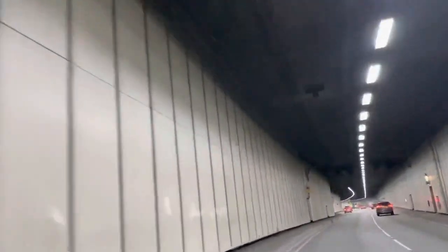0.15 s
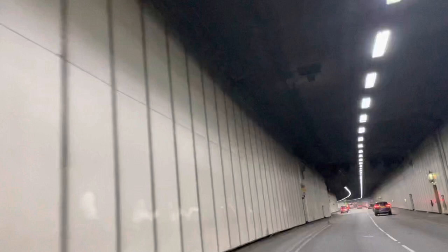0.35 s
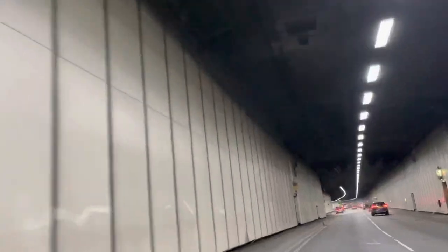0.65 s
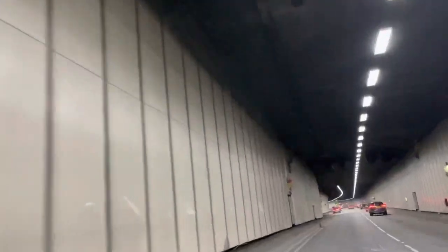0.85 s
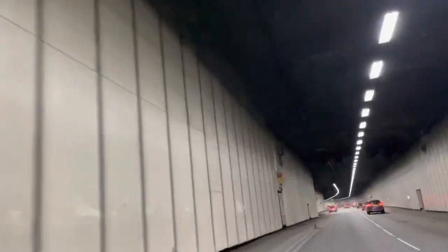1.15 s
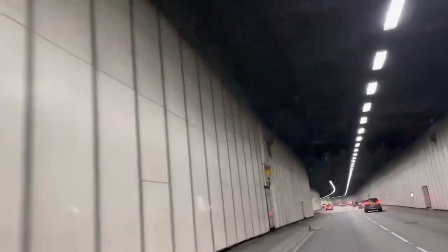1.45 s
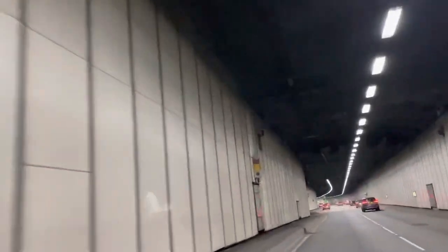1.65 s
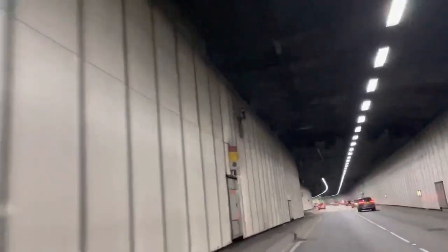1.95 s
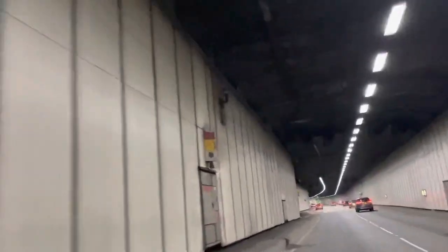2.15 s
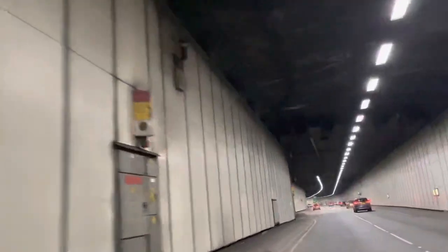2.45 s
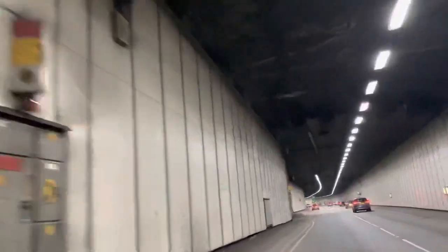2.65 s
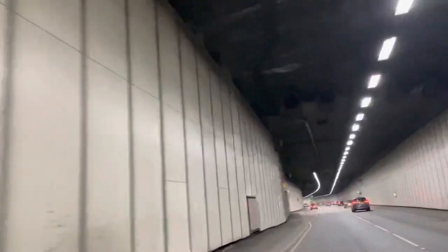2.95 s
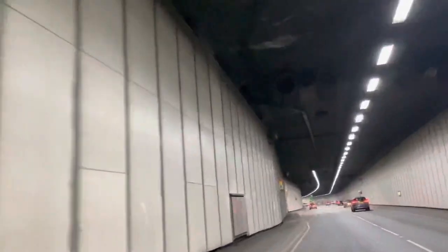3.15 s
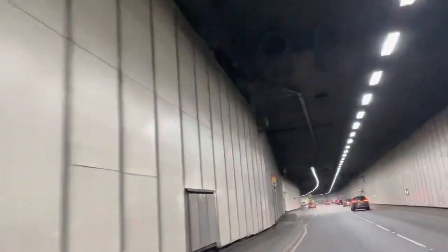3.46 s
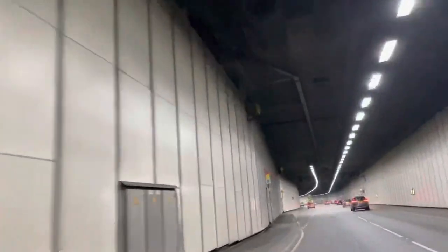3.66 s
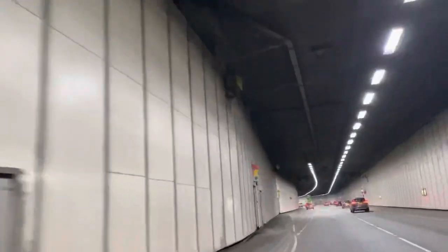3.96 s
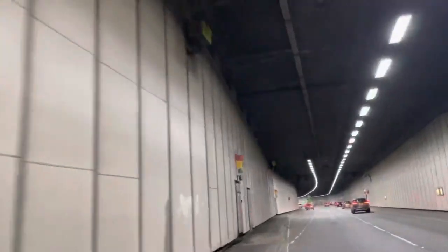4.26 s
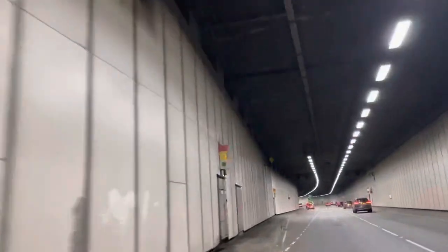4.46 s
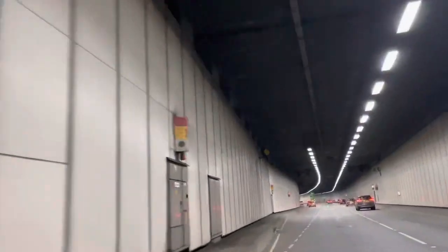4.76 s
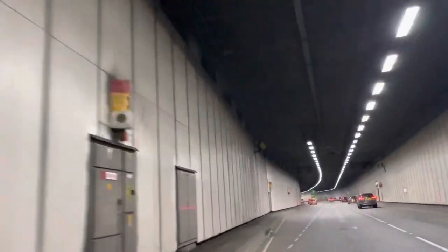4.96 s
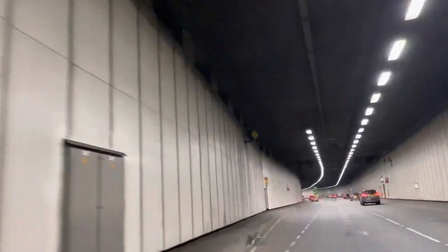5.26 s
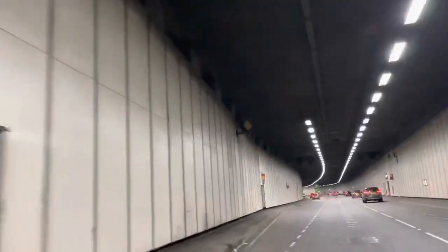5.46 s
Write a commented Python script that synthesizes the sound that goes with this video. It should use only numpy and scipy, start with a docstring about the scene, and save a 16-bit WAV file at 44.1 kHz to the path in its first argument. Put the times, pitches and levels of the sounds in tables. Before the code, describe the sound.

Heard from the front seat of a car cruising through a road tunnel: a steady low rumble, humming tyre drone and duller roar from the walls through the glass. Loose plastic close to the stereo microphones, mostly left, ticks and crackles in irregular clusters, thickest just before two seconds and after four. Small bumps boom in the cabin, and tyres sing briefly between two and four seconds.

```python
"""Inside a car at steady speed in a road tunnel.
The road shakes the cabin into a low rumble, the tyres drone, hum and sing, and their roar returns from the walls
through the glass: all of this is coloured noise or wavering tones. Bumps make the cabin boom like a struck drum.
Loose plastic close to the microphones, a little to the left, ticks and crackles as small slips set it ringing,
and some slips flex its panel into thumps that fall in pitch."""
import sys
import numpy as np
from scipy import signal
from scipy.fft import rfft, irfft
from scipy.io import wavfile

SR = 44100
rng = np.random.default_rng(int(sys.argv[2]) if len(sys.argv) > 2 else 0)


def digitize_waveform(pressure):
    """Quantize a signal to 16-bit integers and store it at the path in sys.argv[1].

    Rows of a 2-D input are taken as channels; values are limited to [-1, 1].
    """
    field = np.atleast_2d(pressure).T
    bounded = np.clip(field, -1, 1)
    quanta = np.round(bounded * 32767).astype(np.int16)
    wavfile.write(sys.argv[1], SR, quanta)


N = 247401
TIME = np.arange(N) / SR   # seconds
BINS = np.arange(N // 2 + 1) * SR / N   # Hz of each step in a spectrum

# noise colours, how strong each pitch is: pitch_hz, level_db
RUMBLE_COLOUR = [(20, -31), (32, -17.5), (42, -10), (55, -2), (75, -3), (100, -6), (135, -10), (220, -27),
                 (500, -72)]
DRONE_COLOUR = [(60, -43.5), (115, -3.5), (150, -0.5), (215, 0.5), (280, -1.5), (400, -2), (470, -7),
                (530, -5.5), (620, -10), (900, -25), (2000, -68)]
ROAR_COLOUR = [(200, -2.5), (500, -1), (700, 2), (1050, 1.5), (1500, -6), (2000, -13), (2700, -18.5),
               (3600, -25), (5000, -28.5), (6300, -32), (8000, -41), (11000, -51), (14200, -75.5),
               (15500, -65)]
# how alike left and right are: pitch_hz, correlation (held between -1 and 1 when used)
LIKENESS = [(40, 0.92), (150, 0.8), (380, 0.72), (600, 0.36), (900, 0.24), (1700, 0), (3100, 0.25),
            (4800, 0.23), (5800, -0.1), (7000, -0.06), (8500, -1.5), (10200, -1), (11500, 0.7)]
# how much louder left is than right: pitch_hz, difference_db
BALANCE = [(60, -0.5), (200, 0.5), (380, 1.5), (700, 4.5), (1300, 2.5), (2400, 0.5), (4400, 0), (8000, 1),
           (15000, -2.5)]
# how far the left side runs ahead of the right: pitch_hz, lead_radians
LEFT_LEAD = [(620, 0.032), (920, 1.38), (1750, 0.12), (3100, 1.1), (4800, 0.7), (5800, 0.042)]
# coarseness of the asphalt, which drives the drone and the roar: time_s, swing_db
ASPHALT_SWING = [(0, -1.5), (.5, -4), (1.0, 0.6), (1.35, -1.5), (2.3, 1.3), (2.75, -0.5), (3.5, -.5),
                 (4.3, 3), (5.0, 1), (5.61, 1)]
# level of the cabin rumble: time_s, level_db
RUMBLE_LEVEL = [(0, -20.5), (.5, -23.5), (1.3, -23.5), (1.7, -20), (2.5, -19.5), (3.1, -21.8), (3.7, -19.5),
                (4.9, -20.5), (5.61, -17.5)]
# patches of road on which the tyres sing: middle_s, reach_s (from the middle to nearly gone), pitch_hz, level_db
SINGING_PATCHES = [(2.295, 0.18, 395, -26), (2.592, 0.054, 388, -22), (2.866, 0.12, 356.8, -19),
                   (3.835, 0.076, 370.5, -22.5), (3.839, 0.072, 409, -17.5)]
# bumps in the road: start_s, strength_db, contact_s
BUMPS = [(0.203, -3, 0.0081), (0.849, -4, 0.0081), (1.005, -4, 0.0073), (1.519, -2, 0.0076),
         (1.735, 0.5, 0.012), (2.034, -5, 0.015), (2.344, -8, 0.0066), (2.499, -9, 0.0055),
         (3.074, -8, 0.0058), (3.254, -3.5, 0.0088), (4.275, -2, 0.021), (4.679, -6, 0.0054),
         (4.801, -6, 0.014), (4.942, -5.5, 0.0041), (5.106, -8.5, 0.011), (5.184, -4, 0.0053),
         (5.262, -10, 0.012), (5.413, -12, 0.0053)]
# ringing of the cabin air and car body: pitch_hz, level_db, time_to_fade_60_db_s
CABIN_MODES = [(53, -11.5, 0.11), (69, -11.5, 0.022), (101, -1.5, 0.078), (152, -0.5, 0.045),
               (195, -4.5, 0.035)]
# panel thumps that come with some of the slips: start_s, level_db (before the fade in and out)
PANEL_FLEXES = [(0.3963, -6.5), (0.5752, -12), (0.719, -9), (0.7933, -10), (1.352, -9), (1.823, -15),
                (2.2665, -15), (2.6508, -15), (4.6767, -2.5), (4.9385, -13), (5.1808, -12), (5.342, -7),
                (5.412, -6.5)]
# clear slips of the loose plastic: snap_s, strength_db, knock_db and bite_db (dull and sharp parts,
# relative to the strength), strongest_ring_hz, length_s
CLEAR_SLIPS = [(.204, -39, 15, -18, 600, 0.0028), (.3885, -26.5, 7, -13, 1400, .004),
               (.3962, -23, 4, -13, 2100, 0.0032), (.5752, -28, 6, -12, 2100, .004),
               (.7195, -28, 5, -10, 2100, 0.0016), (.7921, -20, 1, -4, 2700, 0.0023),
               (1.0882, -19.5, 3.5, -20, 1400, 0.003), (1.0924, -27, 5, -18, 1800, 0.00073),
               (1.346, -30, 7, -13, 1400, 0.0036), (1.3513, -20.5, 3, -6, 2580, .0015),
               (1.3548, -20.5, 3, -14, 2600, 0.0022), (1.3576, -26, 2, -13, 1800, 0.0014),
               (1.389, -32, -4, -8, 4700, .001), (1.6595, -26, -4, -7, 2100, 0.001),
               (1.6729, -33, 7, -14, 1700, 0.0021), (1.678, -25, 2, -9, 3000, 0.00077),
               (1.695, -30, 6, -12, 2100, 0.0017), (1.7147, -17, -2, -5, 2500, 0.0016),
               (1.7432, -33, 0, -15, 2100, 0.00093), (1.7768, -30, 10, -13, 3000, 0.0022),
               (1.8226, -22.5, 4.5, -6.5, 1390, 0.0011), (1.8426, -28.5, 4, -12, 3000, 0.0016),
               (1.859, -32, 1, -6, 2100, 0.0017), (1.8981, -21, -2, -9, 3800, 0.00263),
               (1.903, -24, 6, -17, 2100, 0.0029), (1.9069, -16.5, -3, -14, 2100, 0.0013),
               (1.9108, -20.5, 7, -19, 1400, 0.00064), (1.9145, -18.5, -2, -8.5, 2700, 0.0028),
               (2.1985, -23, -4, -7, 2580, 0.0018), (2.2662, -19, 1.5, -6.5, 3850, 0.0012),
               (2.3386, -27.5, 0, -14, 2100, 0.00086), (2.388, -36.5, 12, -19, 1000, 0.0029),
               (2.5747, -27, 9.5, -17, 1000, 0.0031), (2.592, -27, -1, -22, 2100, 0.00094),
               (2.616, -30.5, 12, -19, 1000, 0.0028), (2.6502, -21, 5, -16, 2680, 0.003),
               (2.658, -30, 2, -8, 3100, .002), (2.6623, -27, 6, -15, 2100, 0.0026),
               (2.704, -31, 5, -17, 1400, 0.0027), (2.912, -29, 8, -24, 2100, 0.0037),
               (3.079, -30, 5.5, -22, 1400, 0.0037), (3.87, -31, 10, -16, 1400, 0.0042),
               (3.8879, -28, -6, -8, 3100, 0.00092), (3.9395, -27, -3.5, -9, 2100, .0015),
               (3.9455, -30, -5, -7, 2600, 0.0022), (3.971, -18, -1, -9, 3100, 0.003),
               (3.9822, -21, 6.5, -9, 1400, 0.0037), (3.987, -18.5, -1, -5.5, 2650, 0.0015),
               (4.0495, -27, 1, -8, 3100, 0.0019), (4.0532, -24, 5.5, -6, 1400, 0.0014),
               (4.057, -27, 2, -7, 2100, .002), (4.132, -19, -4, 0, 4740, 0.00064),
               (4.136, -22, -3, -8, 2600, 0.0015), (4.1805, -20.5, -6, -11, 2580, 0.00077),
               (4.243, -31, -2, -9, 3100, 0.0022), (4.3042, -27, 2, -8, 2650, 0.0022),
               (4.3421, -30, -7, -13, 2100, 0.0011), (4.3909, -17.5, -12, -13, 3000, 0.0014),
               (4.4027, -20, 4.5, -15, 1740, 0.0037), (4.4516, -23, 5.5, -16, 1750, 0.0045),
               (4.4752, -28.5, 8.5, -17, 1400, 0.004), (4.5172, -19.5, -0.5, -6.5, 2100, 0.0011),
               (4.56, -24, -9, -18, 2100, 0.00087), (4.6097, -23, 3, -8, 2730, 0.002),
               (4.6354, -16.5, -2, -15, 1940, 0.00056), (4.6755, -22, 6, -3, 1750, 0.0024),
               (4.68, -31, -4, -1, 5600, 0.0012), (4.8633, -25, 6, -19, 1750, 0.003),
               (4.9362, -24.5, 3, -7, 2650, 0.0014), (4.9392, -23, -3, -7, 2650, 0.0025),
               (5.012, -39, 0, -12, 2100, 0.0021), (5.178, -29, 4.5, -15, 1400, 0.0022),
               (5.182, -17.5, -3, -11.5, 2200, 0.0027), (5.27, -29.5, -2, -11, 2600, 0.0033),
               (5.325, -31, 13, -15, 3500, 0.0045), (5.342, -33, 11, -19, 1400, 0.0017),
               (5.4117, -18, -1, -5.5, 3600, 0.0015)]
# ringing of the plastic and its panel: pitch_hz, level_db, time_to_fade_60_db_s
PLASTIC_MODES = [(335, 19, 0.037), (570, 18.5, 0.022), (980, 14.5, 0.0052), (1371, 20.5, 0.0083),
                 (1754, 19, 0.01), (2120, 18, 0.01), (2637, 16.5, 0.0085), (3090, 14, 0.005),
                 (3940, 18, 0.0039), (4835, 14, 0.0044), (5605, 5.5, 0.0015)]

DRONE_DB, ROAR_DB = -19, -24   # levels where the asphalt swing is 0 dB
ROAR_FOLLOWS = 0.15   # share of the asphalt's swing that the roar takes on
WHEEL_HZ = 12.4   # turns of the wheels a second
RUMBLE_THROB_DB, DRONE_THROB_DB = 1.8, 0.6   # swing up and down with each turn
TREAD_HZ, TREAD_DB = 390.8, -35.5   # steady hum of the tread
KNOCK_HZ = (1400, 1740)   # the knock fades out over this range
BITE_HZ = (2973, 3800)   # the bite sets in over this range
ACCENT_DB, ACCENT_WIDTH = 4, 0.22   # lift near a slip's strongest ring; width as a share of that pitch
FAINT_RING_HZ, FAINT_LENGTH_S = (1700, 3400), 0.0013   # pitch range and length of the small slips
CUTOFF_HZ = 15500   # nothing is heard above this


def from_db(db):
    """Turn decibels into a multiplier for the sound."""
    return 10 ** (np.asarray(db) / 20)


def rms_one(x):
    """Scale a sound to an average (rms) strength of 1."""
    return x / np.sqrt(np.mean(x ** 2) + 1e-20)


def in_time(rows):
    """Join the points of each column by straight lines over time."""
    s, *columns = np.transpose(rows)
    return [np.interp(TIME, s, column) for column in columns]


def at_hz(points, hz):
    """Read a table at any pitch, with equal steps for equal musical intervals."""
    where, value = np.transpose(points)
    return np.interp(np.log(np.maximum(hz, 1)), np.log(where), value)


def drift(rate_hz):
    """A smooth random wander of spread 1: noise whose changes faster than the rate are weakened."""
    spectrum = rfft(rng.standard_normal(N))
    return rms_one(irfft(spectrum / (1 + (BINS / rate_hz) ** 2), N))


def ring(force, hz, t60):
    """A springy part rings at one pitch when pushed; a unit click starts a fading sine of height 1."""
    shrink = from_db(-60 / (t60 * SR))   # per sample
    step = 2 * np.pi * hz / SR
    return signal.lfilter([0, np.sin(step)], [1, -2 * shrink * np.cos(step), shrink * shrink], force + 1e-18)


def butter(x, order, hz, kind):
    """Let through only the pitches below (low) or above (high) a limit."""
    limit_hz = np.clip(hz, 10, .45 * SR)
    return signal.sosfilt(signal.butter(order, limit_hz, kind, fs=SR, output="sos"), x)


def add(track, s, sound):
    """Mix a short sound into the track from time s on."""
    start = int(np.clip(s * SR, 0, N - 1))
    track[..., start:start + sound.shape[-1]] += sound[..., :N - start]


def diffuse(colour):
    """Noise that fills the cabin: alike on both sides in the bass, less so higher up; rms 1 in the middle."""
    noise = rfft(rng.standard_normal((2, N)))
    shared, opposed = noise * from_db(at_hz(colour, BINS)) * (BINS > 10)
    alike = np.clip(at_hz(LIKENESS, BINS), -1, 1)
    side = np.array([[1], [-1]])   # left, right
    both = np.sqrt(1 + alike) * shared + np.sqrt(1 - alike) * opposed * side
    # two microphones hear the noise with different loudness and timing at each pitch
    loudness = from_db(side * at_hz(BALANCE, BINS) / 2)
    timing = np.exp(.5j * side * at_hz(LEFT_LEAD, BINS))
    out = irfft(both * loudness * timing, N)
    return out / np.std(out.mean(axis=0))


def road(rumble_rough_db=0.7, drone_rough_db=1.48, roar_rough_db=1.08):
    """Rumble, drone and roar: turning wheels make the low end throb, uneven asphalt roughens the sound."""
    surface_db, = in_time(ASPHALT_SWING)
    rumble_db, = in_time(RUMBLE_LEVEL)
    turn = np.sin(2 * np.pi * WHEEL_HZ * TIME + .5 * drift(0.39))
    asphalt = drift(46)
    rumble_db = rumble_db + RUMBLE_THROB_DB * turn + rumble_rough_db * drift(15.0)
    drone_db = DRONE_DB + surface_db + DRONE_THROB_DB * turn + drone_rough_db * asphalt
    roar_db = ROAR_DB + ROAR_FOLLOWS * surface_db + roar_rough_db * asphalt
    rumble = from_db(rumble_db) * diffuse(RUMBLE_COLOUR)
    drone = from_db(drone_db) * diffuse(DRONE_COLOUR)
    roar = from_db(roar_db) * diffuse(ROAR_COLOUR)
    return rumble + drone + roar


def hum(hz, width_hz):
    """A narrow band of noise round one pitch, made by two wandering waves; rms 1."""
    phase = 2 * np.pi * hz * TIME
    return rms_one(drift(width_hz) * np.cos(phase) + drift(width_hz) * np.sin(phase))


def tread(width_hz=22, waver_hz=2.71):
    """Unevenly spaced tread blocks hum; on each singing patch a clear, wavering note swells and fades."""
    out = from_db(TREAD_DB) * hum(TREAD_HZ, width_hz)
    for middle_s, reach_s, hz, level_db in SINGING_PATCHES:
        pitch_hz = hz + waver_hz * drift(8.5)
        note = rms_one(np.sin(2 * np.pi * np.cumsum(pitch_hz) / SR))
        swell = np.exp(-2 * ((TIME - middle_s) / reach_s) ** 2)
        out += from_db(level_db) * swell * note
    return out


def bumps():
    """The tyre softens each bump into a push and a rebound; the cabin booms, deeper for a long contact."""
    force = np.zeros(N)
    for s, strength_db, contact_s in BUMPS:
        push = np.sin(np.linspace(0, 2 * np.pi, int(contact_s * SR)))
        add(force, s, from_db(strength_db) * push / np.abs(push).sum())
    return sum(from_db(db) * ring(force, hz, t60) for hz, db, t60 in CABIN_MODES)


def panel_thumps(start_hz=1000, travel_s=0.00544, attack_s=.001, fade_s=.014, vary=0.19, left_db=0.0, size=2048):
    """Low bending waves cross the panel more slowly than high ones, so each thump falls steeply in pitch."""
    t, out = np.arange(size) / SR, np.zeros(N)
    for (s, level_db), own in zip(PANEL_FLEXES, rng.standard_normal(len(PANEL_FLEXES))):
        own_travel_s = travel_s * np.exp(vary * own)
        hz = start_hz / (1 + t / own_travel_s) ** 2
        envelope = (1 - np.exp(-t / attack_s)) * np.exp(-t / fade_s)
        add(out, s, from_db(level_db) * envelope * np.sin(2 * np.pi * np.cumsum(hz) / SR))
    return out * from_db([[left_db], [-left_db]])


def faint_slips(per_s=18, level_db=-39.0, spread_db=2.0, knock_db=-2, bite_db=-14, colour_db=4):
    """Small slips scattered at random at a steady rate, with the same columns as the clear slips."""
    when, strength, dull, sharp, pitch = rng.uniform(-1, 1, (int(per_s * N / SR), 5)).T
    return np.transpose([
        (when + 1) / 2 * N / SR,
        level_db + spread_db * strength,
        knock_db + colour_db * dull,
        bite_db + colour_db * sharp,
        np.interp(pitch, [-1, 1], FAINT_RING_HZ),
        np.full(len(when), FAINT_LENGTH_S)])


def catches(length_s, catch_max=1.08, creep_max=0.24, creep_s=0.0055, rattle_max=0.14, rattle_s=0.0081, count=7):
    """Each slip creeps, snaps among smaller catches and rattles out: delays from the snap (s) and forces."""
    when, size = rng.random((len(length_s), 2, 3, count)).transpose(1, 2, 0, 3)
    length = length_s[:, None]
    size = 2 * size - 1   # pushes go either way
    delay = np.hstack([
        np.zeros_like(length),   # the snap
        length * (1.6 * when[0] - 1),   # catches before and after it
        -creep_s * when[1],
        length / 2 + rattle_s * when[2]])
    snap = np.sign(size[2][:, :1])
    force = np.hstack([snap, catch_max * size[0], creep_max * size[1], rattle_max * size[2]])
    return delay, force


def loose_plastic(detune=0.051, vary_db=1.0, ear_vary_db=3.0, far_side_db=-9.5, soft_hz=6400, crisp_db=-8,
                  bend_s=0.0007, size=2048):
    """Each slip grips at another spot: it favours one ring, shifts the modes and has its own knock and bite."""
    slips = np.vstack([CLEAR_SLIPS, faint_slips()])
    hz, mode_db, t60 = np.transpose(PLASTIC_MODES)
    knock, bite = np.interp(hz, KNOCK_HZ, [1, 0]), np.interp(hz, BITE_HZ, [0, 1])
    # the bass reaches both sides alike, the middle range favours the left
    apart = np.interp(hz, [300, 1300, 4500, 6500], [0, 1, 1, .5])
    # bending waves carry the low modes through the panel later
    late_s = bend_s * (np.sqrt(np.median(hz) / hz) - 1)
    chance = rng.standard_normal((len(slips), 3, len(hz)))
    delays, forces = catches(slips[:, -1])
    out = np.zeros((2, N))
    for slip, delay, force, own in zip(slips, delays, forces, chance):
        s, strength_db, knock_db, bite_db, ring_hz, _ = slip
        first_s = delay.min()
        grip = np.bincount(((delay - first_s) * SR).astype(int), force, size)   # a train of clicks
        accent_db = ACCENT_DB * np.exp(-(np.log(hz / ring_hz) / ACCENT_WIDTH) ** 2)
        colour_db = mode_db + accent_db + knock * knock_db + bite * bite_db
        left_db = strength_db + colour_db + vary_db * own[0]
        right_db = left_db + apart * (far_side_db + ear_vary_db * own[1])
        for k, pitch_hz in enumerate(hz * np.exp(detune * own[2])):
            tone = (-1) ** k * ring(grip, pitch_hz, t60[k])   # neighbouring modes swing opposite ways
            gain = from_db([[left_db[k]], [right_db[k]]])
            add(out, s + first_s + late_s[k], gain * tone / np.linalg.norm(tone))
    # the ticks are mostly below the soft limit, with a little crisp treble far above it
    body = butter(out, order=6, hz=soft_hz, kind="low")
    treble = butter(out, order=4, hz=2 * soft_hz, kind="high")
    return body + from_db(crisp_db) * treble


def scene():
    """Everything as heard from the front seat, with the tread slightly to the left."""
    tyre_tones = tread() * from_db([[.8], [-.8]])
    return road() + tyre_tones + bumps() + panel_thumps() + loose_plastic()


def record(dry, low_cut_hz=34):
    """The microphones drop the deepest bass, the highest peaks are rounded off and the top is cut."""
    heard = butter(dry, order=3, hz=low_cut_hz, kind="high")
    rounded = heard / (1 + heard ** 12) ** (1 / 12)
    return signal.sosfilt(signal.ellip(10, .1, 80, CUTOFF_HZ, fs=SR, output="sos"), rounded)


dry = scene()
out = record(dry)
digitize_waveform(out)
```